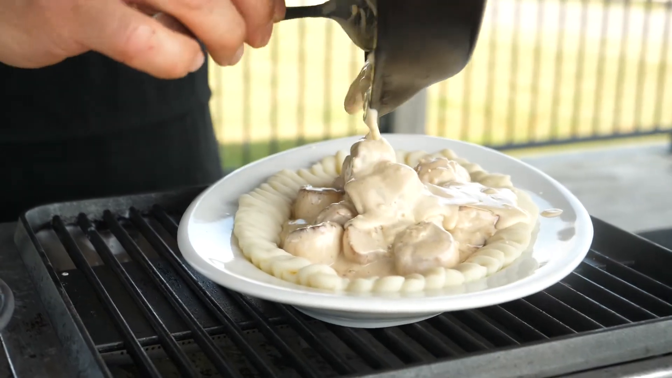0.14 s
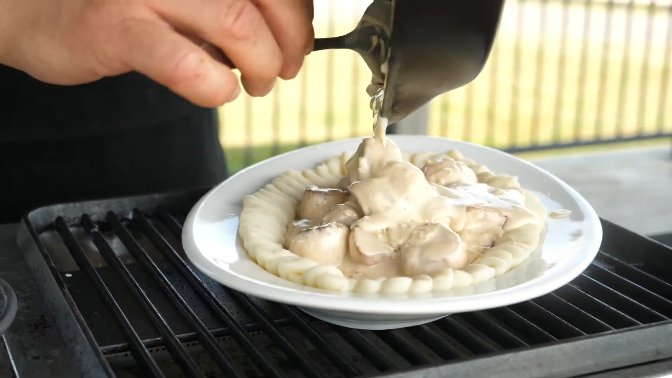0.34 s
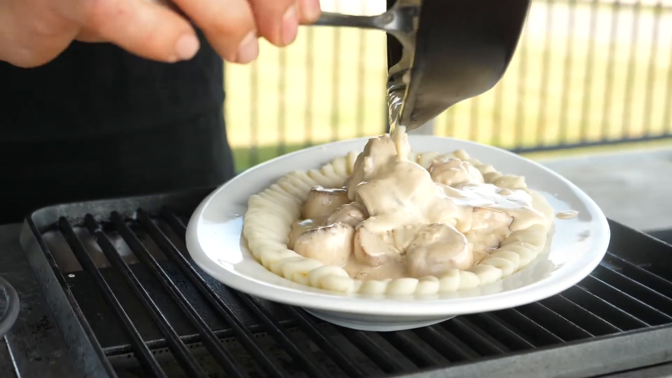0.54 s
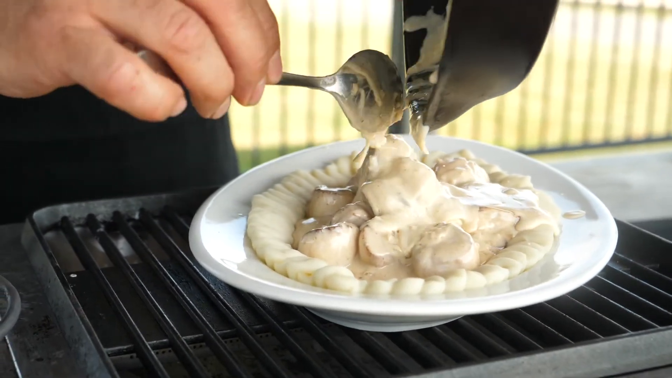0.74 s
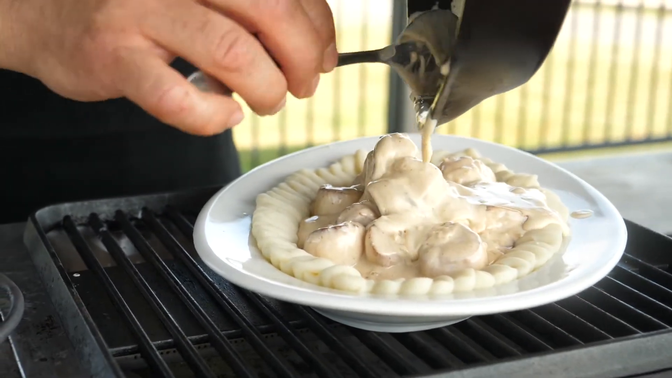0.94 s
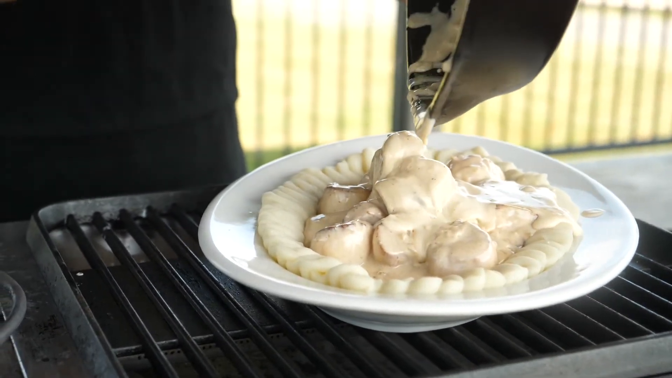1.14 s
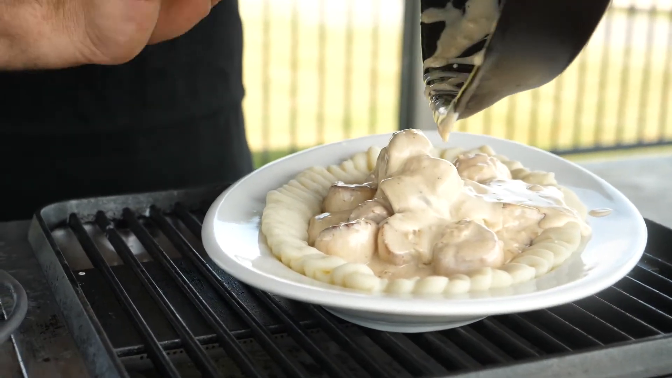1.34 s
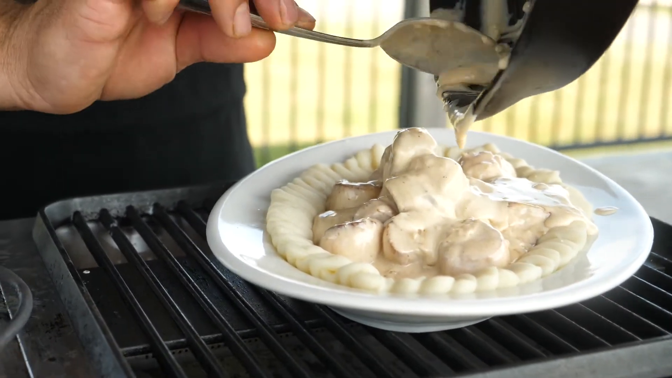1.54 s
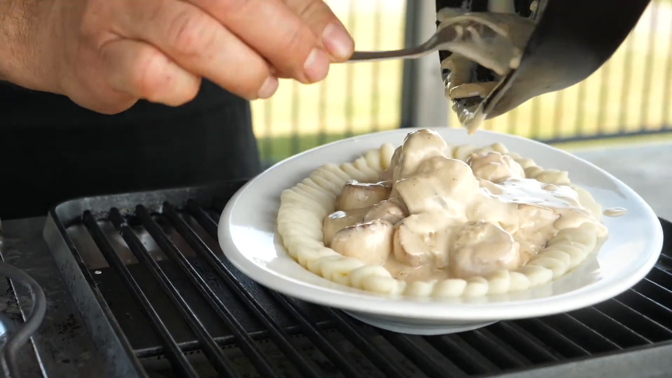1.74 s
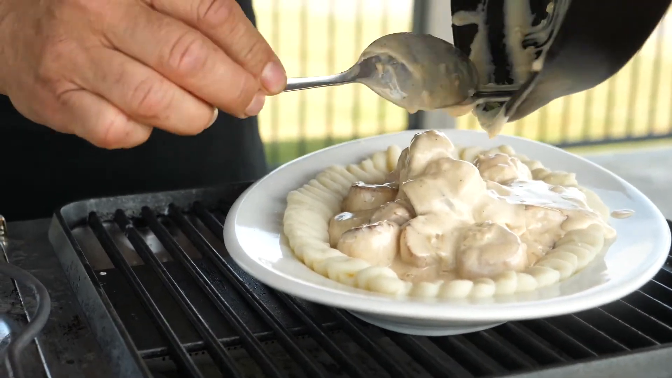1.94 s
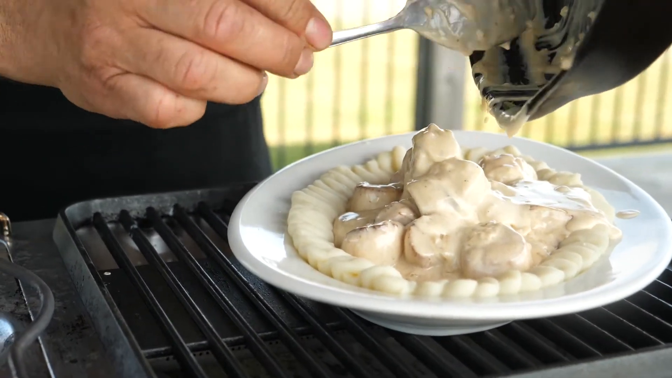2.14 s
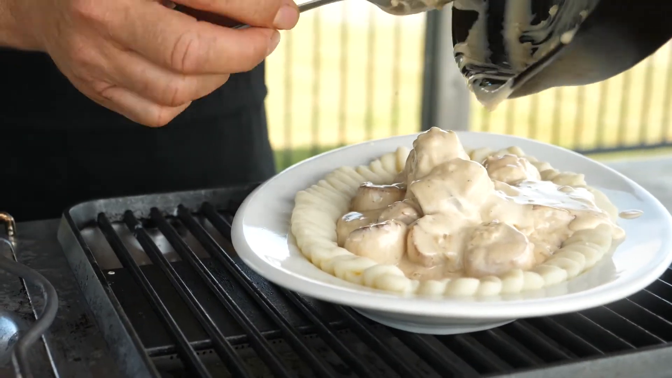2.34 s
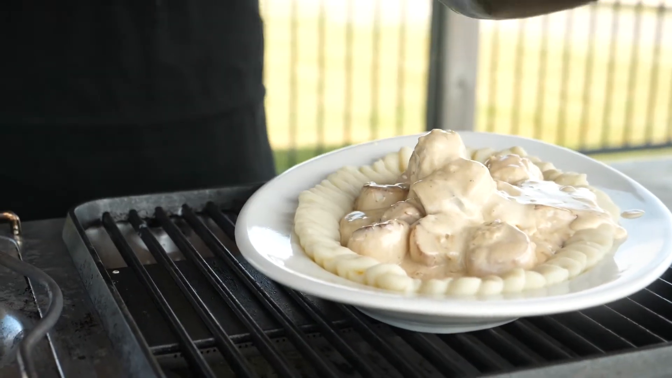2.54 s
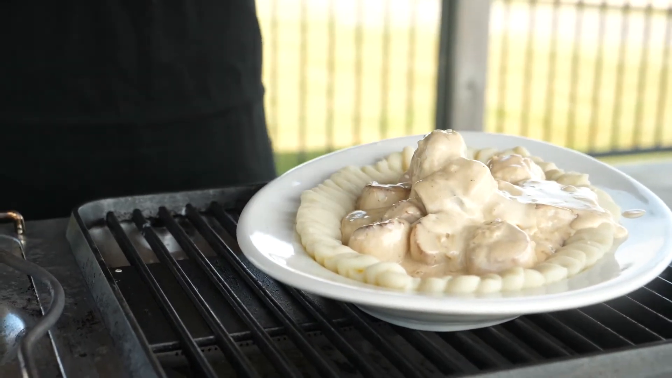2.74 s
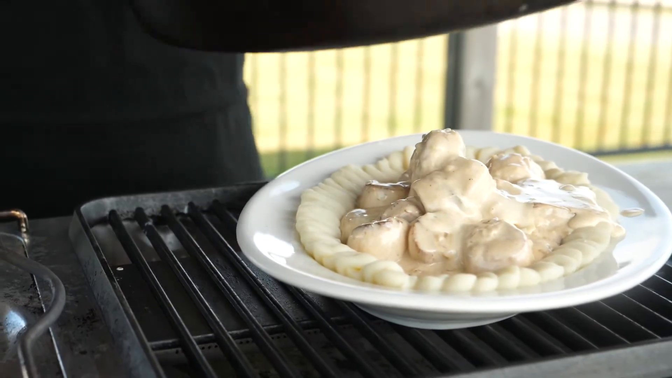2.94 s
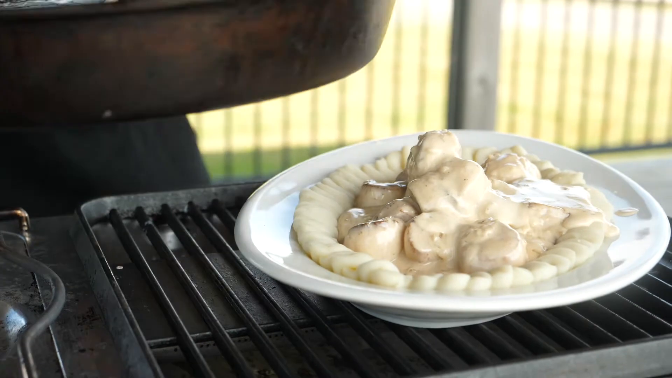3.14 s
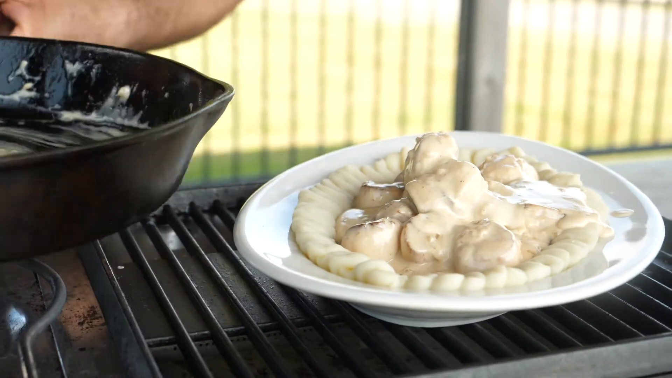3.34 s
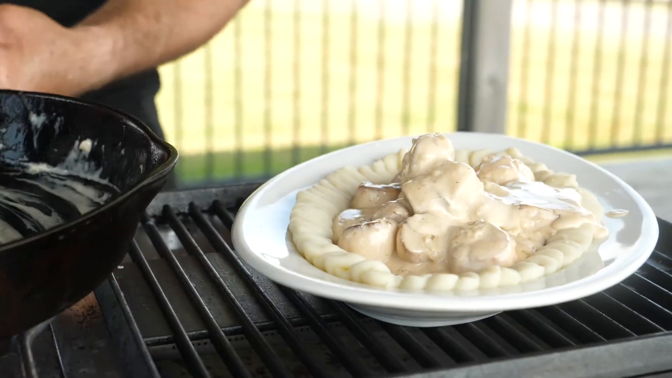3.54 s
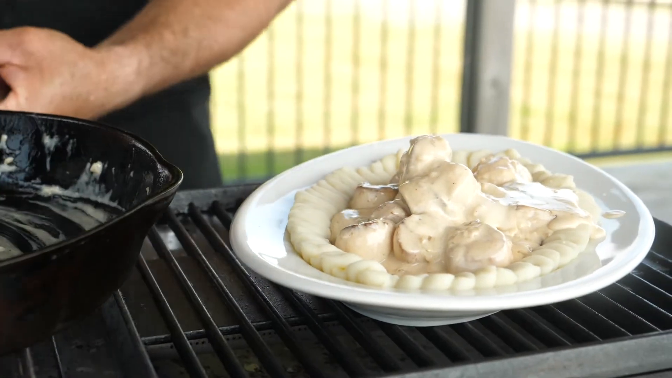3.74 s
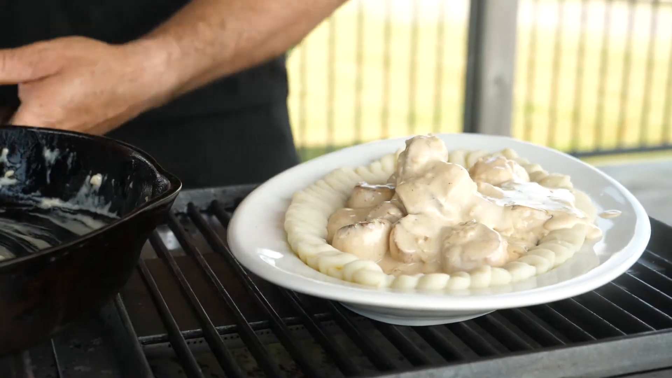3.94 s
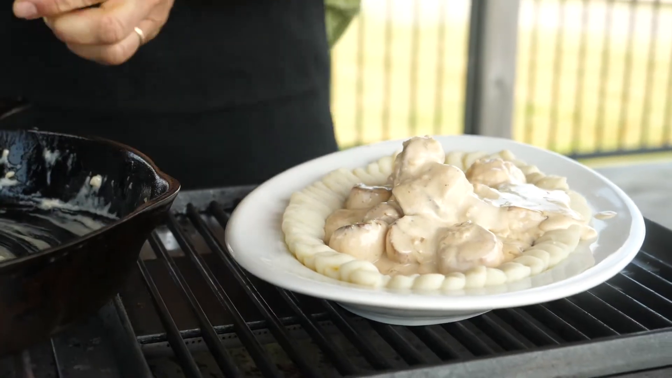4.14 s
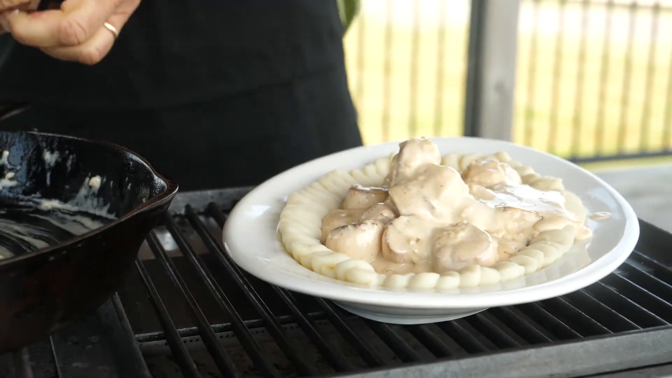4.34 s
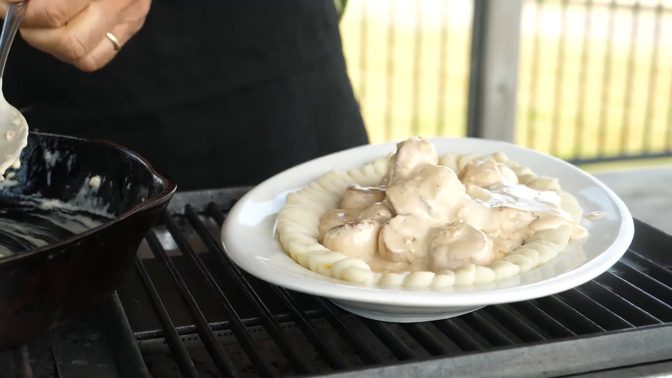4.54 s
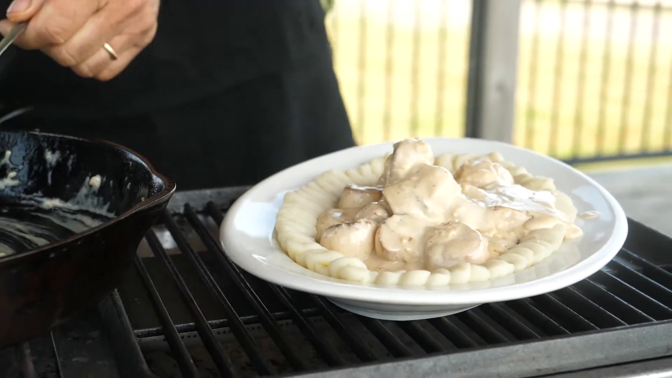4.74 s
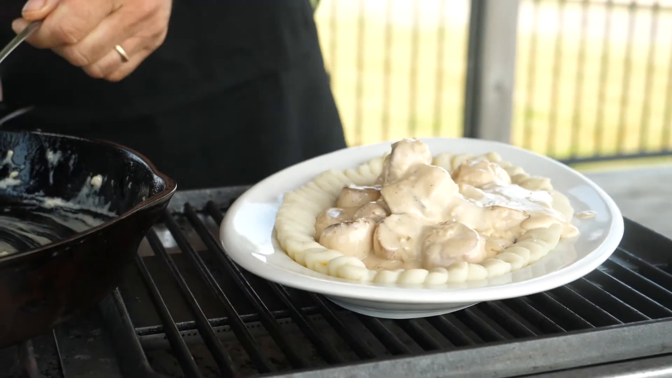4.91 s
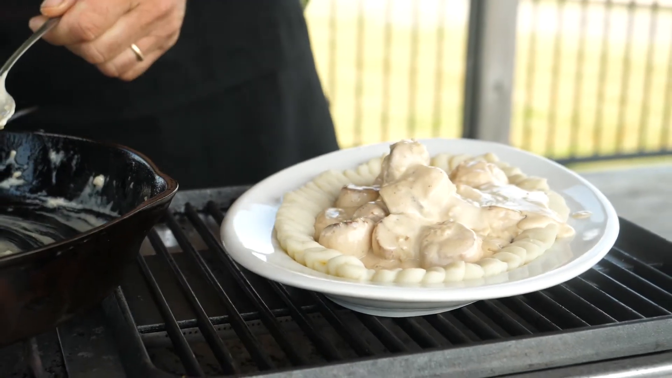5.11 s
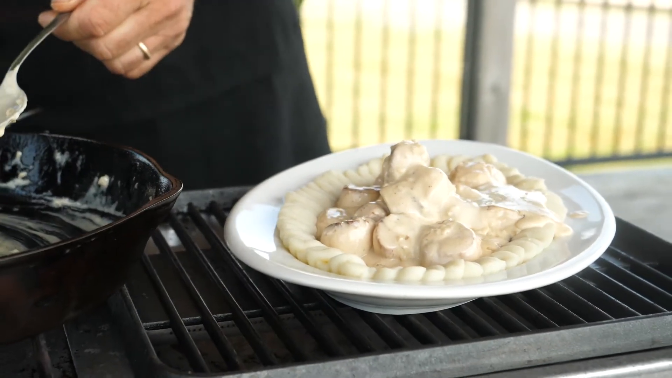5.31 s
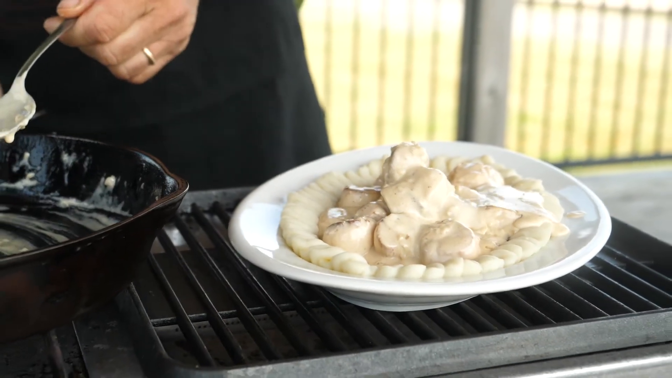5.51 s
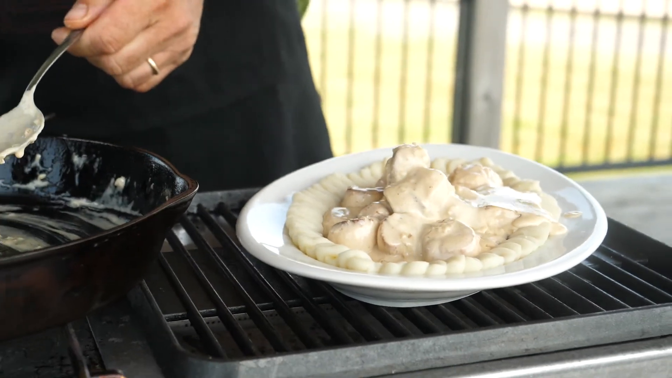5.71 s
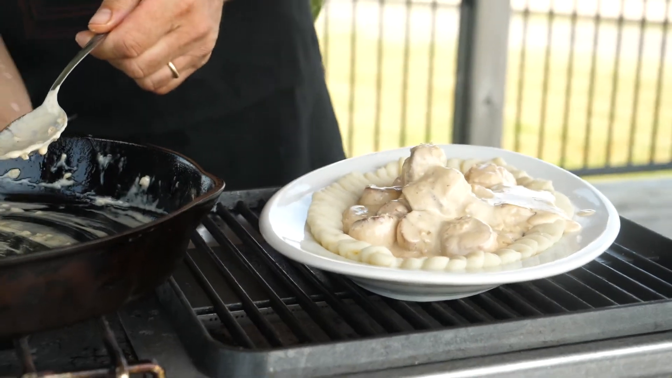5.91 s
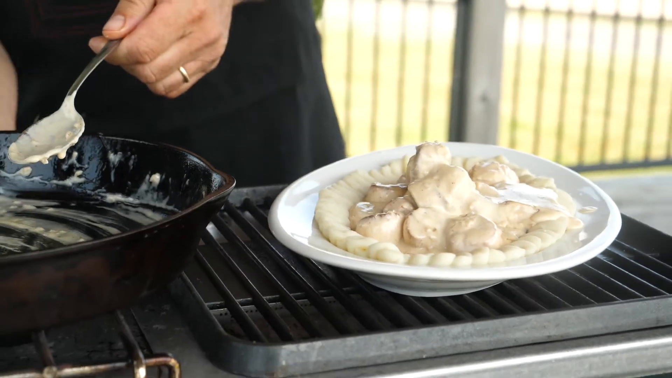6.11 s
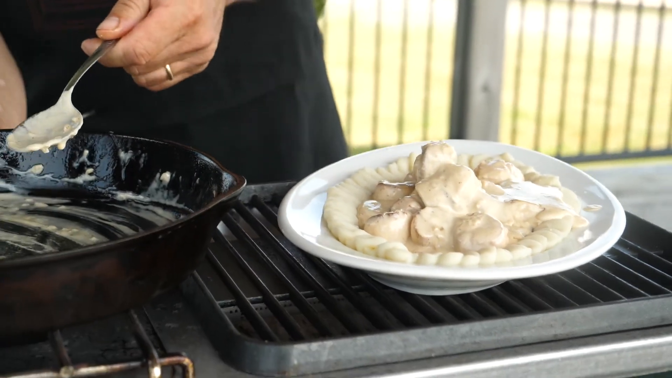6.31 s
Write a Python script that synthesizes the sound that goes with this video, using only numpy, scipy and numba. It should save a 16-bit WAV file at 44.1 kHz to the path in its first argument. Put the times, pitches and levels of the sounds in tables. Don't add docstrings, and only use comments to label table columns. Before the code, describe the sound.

Close outdoors on a porch, a steel spoon clinks irregularly against a heavy iron skillet, with short gritty scrapes between the ringing taps, the last two main ones loudest. After a quiet gap the skillet lands on a metal grate with two heavy clanks and a fading rattle. Soft knocks follow over a faint burner hiss and whistle, low distant rumble and light wind buffeting the microphone.

```python
import sys
import numpy as np
from scipy import signal
from scipy.fft import rfft, irfft, next_fast_len
from scipy.io import wavfile
from scipy.ndimage import uniform_filter1d
from numba import njit

SR = 44100
rng = np.random.default_rng(int(sys.argv[2]) if len(sys.argv) > 2 else 0)


def how_loud(loudness_db):
    steps = np.asarray(loudness_db, float) / 20
    return 10 ** steps


def transcribe(u):
    v = np.clip(np.atleast_2d(u).T, -1, 1)
    q = np.round(v * 32767).astype(np.int16)
    wavfile.write(sys.argv[1], SR, q)


N = 285182
TIME = np.arange(N) / SR

# (frequency [Hz], density [dB/Hz])
TOWN_SPECTRUM = [(24, -83), (40, -53.5), (106, -15), (177, -2.5), (288, 0), (807, -12), (1030, -13),
                 (1100, -11), (1210, -11.5), (2600, -29.5), (3380, -47.5), (5720, -120)]
# (time [s], level [dB])
TOWN_LEVEL = [(0, -46.5), (.15, -54.5), (1.5, -54.5), (2.1, -57), (3.5, -56.5), (4.45, -57), (5.95, -53.5),
              (6.07, -53), (6.17, -59.5), (6.47, -61.5)]
# (frequency [Hz], density [dB/Hz])
WIND_SPECTRUM = [(40, -27.5), (60, -17.5), (100, -2.5), (160, -3), (260, -24.5)]
# (time [s], level [dB])
GUST_PEAKS = [(0.0, -75), (.5, -59.5), (0.759, -60), (1.05, -64.5), (1.5, -57), (1.749, -59), (2.021, -62),
              (2.6, -72), (3.369, -72), (4.75, -62.5), (4.9, -61.5), (5.21, -58), (5.38, -55), (5.599, -52),
              (5.75, -60), (6.07, -71.5), (6.47, -54.5)]
# (frequency [Hz], density [dB/Hz])
HISS_SPECTRUM = [(1060, -31), (1800, -2.5), (2610, -1.5), (3410, 3.5), (3990, 2.5), (7100, 3.5),
                 (15000, -5), (16000, -12.5), (16500, -43)]
# (time [s], level [dB])
HISS_LEVEL = [
    (4.75, -67.5),
    (5.13, -72),
    (5.9, -67.5),
    (6.1, -73),
]
# (frequency [Hz], width [Hz], level [dB])
BURNER_JETS = [(3470, 90, -19), (4500, 76, -16.5), (4990, 160, -9), (6000, 210, -5.5), (6787, 350, -11),
               (8006, 210, -13.5)]
# (time [s], whistle level [dB], jets re hiss [dB])
BURNER_LEVEL = [(2.6, -78.5, -8.5), (2.75, -71, -5), (3.45, -78, -2.5), (4.4, -63.5, -5),
                (4.65, -61.5, -10), (5.13, -61.5, 4.5), (5.79, -62.5, -0.5), (5.96, -57, -3),
                (6.22, -85.5, -12), (6.47, -83, -5)]
# (time [s], level [dB])
WIPE_LEVEL = [
    (4.6, -85.5),
    (4.64, -63),
    (4.7, -58.5),
    (4.75, -61),
    (4.8, -68),
]

# (time [s], peak [dB], centre [Hz])
CLICKS = [(2.7107, -50, 9000), (2.7334, -68, 3500), (2.7455, -41, 8520), (2.8404, -49, 4450),
          (4.4379, -52, 5380), (4.4877, -46, 6950)]

# (frequency [Hz], share of its band [dB], t60 [s])
GRATE_MODES = [(126.9, -14.5, 0.83), (305, -4, 0.088), (326.3, -7, 0.15), (406.6, -6, 0.2),
               (429.5, -4.5, 0.2), (365.6, -6, 0.15), (534, -8.5, 0.086), (539, -11.5, 0.18),
               (711, -8.5, 0.12), (947, -6.5, 0.17), (1019, -3, 0.074), (1066, -6, 0.086),
               (1283, -8, 0.055), (1320, -1.5, 0.049), (1422, -3, 0.083), (870, -12, 0.086),
               (2114, -8, 0.15), (2374, -6, 0.15), (2626, -6, 0.25), (2856, 0, 0.19), (3260, -6, 0.14),
               (3730, -17.5, 0.3), (4380, -8.5, 0.11), (4650, -13.5, 0.61), (5260, -3.5, 0.054),
               (5800, -0.5, 0.067), (6950, -10, 0.096), (7640, -9, 0.1), (7950, -19.5, 0.26),
               (8650, -15.5, 0.069)]
GRATE_BAND_HZ = [170, 420, 1100, 2800, 6500]
# (time [s], thud [dB], bar clank re thud [dB], sharp edge re thud [dB])
LANDING_BLOWS = [(3.633, -19.5, -2.5, 12.5), (3.639, -13, -7.5, -15), (3.65, -15.5, -15, -2.5),
                 (3.744, -28.5, -12, -13.5), (3.839, -11.5, -2.5, -7), (3.848, -13.5, -5.5, -7),
                 (3.894, -26, -24, -6.5), (3.926, -21, -7.5, -37), (3.932, -25.5, -15, -33),
                 (3.947, -39, 9.5, 7.5), (3.957, -21, -7, -1), (3.996, -42.5, 9, 12.5),
                 (4.008, -26, -11, -22), (4.026, -27.5, -21, -8), (4.044, -33, -7.5, -25),
                 (4.067, -31, -3, -2.5), (4.1, -27, -29, -31), (4.126, -53, 16.5, -4),
                 (4.191, -37.5, -1.5, -12), (4.256, -37.5, -5, -13), (4.339, -43, -5.5, -10.5)]
# (time [s], thud [dB], bar clank re thud [dB], sharp edge re thud [dB])
NUDGE_BLOWS = [(4.668, -46.5, 7, -19), (4.737, -29.5, -10.5, -12), (5.135, -46, -13.5, -25),
               (5.262, -41.5, -8, -16), (5.41, -33.5, -11, -18), (5.711, -44.5, -5.5, -22),
               (5.806, -28, -13.5, -17.5), (5.83, -38, -24, -36.5), (5.895, -37.5, -5.5, -24),
               (6.04, -37, -8, -31.5), (6.076, -36, -4, -30), (6.152, -49, -4, -23),
               (6.234, -43.5, -0.5, -9), (6.434, -41, 4, -19.5), (6.443, -32.5, -4, -26)]
# (start [s], length [s], level [dB], tilt [dB/octave], fade [dB/s])
RATTLES = [
    (3.658, 0.17, -22, -1.5, 188),
    (3.858, 0.081, -30, 1, 148),
    (3.952, 0.52, -33.5, -1.5, 40.5),
    (6.02, 0.14, -44, -3, 25),
]
# (time [s], level [dB])
WALL_CHIMES = [(3.846, -30), (3.948, -53), (3.997, -43), (4.068, -46), (4.127, -51), (5.712, -63),
               (5.926, -61), (6.13, -70), (6.24, -65)]

LOW_MODE_HZ = [487, 912.7, 946.3, 1414, 1791, 2083, 1570, 1930]
# (share of its band [dB], t60 [s])
LOW_MODES = [(0, 0.55), (0.5, 1), (0.5, 1), (-3.5, 0.5), (-17, 0.45), (5, 0.21), (-16.5, .15), (-13, 0.16)]
# (frequency [Hz], share of its band [dB], t60 [s])
SKILLET_MODES = [(2443, -15, 0.17), (3550, -8, 0.026), (3903, -12.5, 0.087), (5120, -7.5, 0.074)]
# (frequency [Hz], share of its band [dB], t60 [s])
SPOON_MODES = [(5474, -1, 0.049), (6220, -2, 0.011), (7113, -4, 0.018), (7857, -3, .025), (8670, -3.5, .03),
               (6454, -12.5, .09), (9660, -14, 0.053), (10480, -6.5, .045), (9370, -16.5, 0.043),
               (11260, -12, .048), (13800, -15.5, 0.037), (14600, -22, 0.034)]
TAP_BAND_HZ = [913, 947, 488, 1424, 2085, 6300, 2900, 4700, 8300, 11500]
WALL_MODE_HZ = [2535, 2589, 2853, 3305, 3722]
RIM_MODE_HZ = [4375, 4683, 4884, 5094, 5727]
BOWL_MODE_HZ = [6100, 6525, 6729, 7183, 7640]
SHANK_MODE_HZ = [5525, 6190, 8000, 8667, 1430]
# (t60 [s], response to sliding [dB])
CLEAR_MODES = [(.25, -35.5), (0.32, -37.5), (0.16, -47), (.25, -51.5), (0.21, -42.5), (0.22, -40.5),
               (0.2, -41.5), (0.11, -42), (0.13, -41.5), (0.081, -25), (.09, -36.5), (.11, -35),
               (0.063, -41), (.11, -44.5), (0.099, -40), (0.131, -35.5), (0.092, -31.5), (0.048, -35),
               (0.094, -35.5), (.6, -35)]

# (time [s], blow [dB], brightness [dB], wall modes re blow [dB], lean to the upper wall mode [dB])
TAP_BLOWS = [(0.0084, -11.5, -2.5, -11, 1), (0.2763, -19.5, -6.5, -17, 7), (0.3079, -13, -7.5, -13, 3),
             (0.3718, -40, -8, -24.5, -12), (0.5789, -14, 4, -23, 7), (0.685, -42, -6, -5, 3),
             (0.9186, -17.5, 4, -6, 3.5), (1.1859, -29, -0.5, -3, -2), (1.503, -41.5, -4, 3, 8),
             (1.7889, -4.5, 2, -17.5, -1.5), (1.9697, -37.5, 6, 1, 3.5), (2.248, -1, 2.5, -14, 0)]
# (rim pair [dB], bearing [deg], floor pair [dB], reach from centre [deg], lowest mode [dB])
TAP_SPOTS = [(-30, 3.45, -32, 26, -39.5), (-42, 170, -30.5, 120, -50), (-41, 6, -32.5, 54, -35.5),
             (-45, 31, -40.5, 66, -45.5), (-37, 35, -33, 33, -37.5), (-39, 60, -36, 34, -40.5),
             (-34.5, 43, -26, 35, -40.5), (-42.5, 8, -36, 39, -37), (-41, 49, -36, 9.7, -67),
             (-39.5, 24, -33.5, 63, -41), (-46.5, 60, -50, 30, -70), (-41, 63, -26.5, 60, -40.5)]
# (highest band re rule [dB], old ring left by the landing spoon [dB])
TAP_TOUCH = [(2.5, -9), (-4, -10), (1.5, -14), (0, -5), (-9, -16), (-2, -10), (-1, -8), (-11, 0.5),
             (-4, -1), (-4, -9), (-14, -3), (0.5, -18)]
TAP_WALL = [(-22, -32, -16, -19, -27), (-14, -21.5, -11, -11.5, -8), (-18, -28, -4, -39.0, -15),
            (-7, -6, -7.0, -6, -7), (-13.5, -20.5, -38, -27, -19), (-4.0, -11, -24.0, -19.0, -17),
            (-33, -33.5, -29, -14, -6), (-10, -10, -6, -6, -1), (0.5, 17.5, 3, 10, -1),
            (-22, -20.5, -27, -29, -24), (-11, -8.5, -23, -33, -2), (-22, -20, -32, -23.5, -21)]
TAP_RIM = [(-26, -14.5, -8.5, -10, -8.5), (-29.0, -4, -5, -21.0, 3), (-19, -25, -7, -14, -9),
           (-17.0, -40, -10.0, -8.0, -1.0), (-21, -30, -28.5, -23, -18), (-12.0, -24.0, -6.0, -3.0, 2),
           (-21.5, -17, 4, -11, 7), (-6, 4.5, -8.5, -21.0, 1), (-2, 0, -11.0, -22.0, 17),
           (-29, -20, -32.5, -12.5, -11), (-19, -2.5, -10, -19.5, 5), (-23.5, -21.5, -18, -19, -2)]
TAP_BOWL = [(-19.5, -20, -22, -22, -21), (-22, -18, -16, -30.0, -29.0), (-27.0, -22, -26, -5, -5),
            (-4, -1, -16.0, -4.0, -10.0), (-5, -10, -22.0, -8, -15), (2.5, -10.0, 20, -7.0, -7),
            (-24.0, -12, -14.5, 5, -11), (-5.0, -1, 0, 2, -1), (-4, 0, 1.0, -6.0, -9.0),
            (-0.5, -7.5, -4, -11, -7), (6, 7, -12.0, -6, -16.0), (-3.5, -4.5, -11.5, -22.5, -27.5)]
# (each shank mode, then the floor twin, re blow [dB])
TAP_SHANK = [(-3, -15, 0.5, -28, -25), (-1, -26, -8, -4, -18), (-3.5, -21, -2, -19, -7),
             (0, -5, -9, -16, -20), (-31.5, -18, 11, -2, -22), (-14, -8, 0, -12, -14),
             (-8, -6.5, 11.5, -17, -8.5), (-7, -15, 10.5, 3, -5), (-8, 0, -5, 0.5, 22),
             (-8.5, -16.5, -13, -7, -29.5), (1, 4, -11, -25, -21), (-12.5, -0.5, -10, -17.5, -24)]
# (level re blow [dB], centre [Hz])
TAP_CRACKS = [(-14.5, 6330), (-13, 7200), (-7, 6500), (-20, 6500), (-3.5, 6700), (-20, 6500), (-8, 7500),
              (-14, 7500), (-10, 6500), (-10, 6300), (-20, 6500), (-13.5, 6400)]

# (start [s], end [s], pressure [dB], change along the stroke [dB], body [dB])
STROKES = [(0.045, 0.139, -41.5, -2.5, -39.5), (0.319, 0.413, -39.5, 13.5, -43.5),
           (0.627, 0.704, -36.5, 5.5, -46.5), (0.682, 0.776, -44, -17, -44.5),
           (0.931, 1.027, -40.5, -2.5, -42.5), (1.273, 1.436, -43, 4, -43), (1.396, 1.505, -38.5, 0, -38.5),
           (1.473, 1.604, -41.5, -2.5, -44.5), (1.864, 2.004, -42.5, 0, -46)]
# (lower rim [dB], upper rim [dB], floor [dB], inner floor [dB], wall modes [dB])
STROKE_PATHS = [(-6, -3, 3, -2.5, -0.5), (-4, -4, -2, 2, 3.5), (-16, 6, 1.5, -4, 0.5),
                (-2.5, 3, -4.5, 3, 5), (-6, -1.5, 5, 0, -3.5), (-2.5, 4.5, -2.5, -1.5, 1),
                (-8, -4, 0, -4, 4.5), (-6.5, -4.5, 2.5, 5, -6), (-1.5, -3.5, -0.5, 1, 6)]
# (centre at start [Hz], centre at end [Hz], level [dB])
STROKE_HOLLOWS = [(1120, 1300, -64.5), (1350, 1400, -58), (1366, 1700, -52), (886, 1100, -55),
                  (1350, 1200, -59), (1250, 1450, -53.5), (1460, 1200, -51), (1300, 720, -56.5),
                  (1200, 1300, -52)]
# (time [s], length [s], treble [dB], rim squeal [dB], body [dB])
EDGE_CATCHES = [(0.076, 0.016, -1, 2, -5.5), (0.373, 0.026, 4, 2, 5), (0.641, 0.023, 6.5, 7.5, 3),
                (0.668, .008, 2.5, 6, 3), (0.679, 0.01, 5.5, 7, 7.5), (0.717, 0.011, 4, 0.5, 5.5),
                (0.727, 0.026, 6.5, 13.5, 6), (1.259, 0.022, -4, 0, 5), (1.294, 0.017, 3.5, 6, -1),
                (1.334, 0.039, 1.5, 4.5, 1), (1.377, 0.017, 1, -10, 0.5), (1.427, 0.02, 2.5, 6, 1),
                (1.505, 0.039, -1.5, 2, 5.5), (1.544, 0.04, 2.5, -2, 3), (1.888, 0.025, 1, 3, 3),
                (1.914, 0.015, 1.5, -1.5, 1.5), (1.963, 0.018, 4.5, 3.5, -2)]

BODY_FOLLOWS = 0.4


def unit(x):
    return x / np.sqrt(np.mean(x ** 2))


def curve(rows):
    s, *columns = np.transpose(rows)
    return np.array([np.interp(TIME, s, c) for c in columns])


def contact(rows):
    since_start = TIME - rows[0][0] + 0.013
    until_end = rows[-1][0] - TIME
    return np.clip(np.minimum(since_start, until_end) / 0.01, 0, 1)


def walk(rate_hz):
    hold = int(SR / rate_hz)
    steps = np.repeat(rng.standard_normal(N // hold + 1), hold)
    return unit(uniform_filter1d(uniform_filter1d(steps, hold), hold)[:N])


def resonate(x, hz, t60_s):
    pole = np.exp(2j * np.pi * hz / SR - np.log(1000) / (t60_s * SR))
    return signal.lfilter([0, pole.imag], [1, -2 * pole.real, abs(pole) ** 2], x)


def narrow_noise(hz, width_hz):
    return unit(resonate(rng.standard_normal(N), hz, 2.2 / width_hz))


def coloured(points, flicker_db, rate_hz):
    hz, db = np.transpose(points)
    size = next_fast_len(N, real=True)
    bins = np.maximum(np.arange(size // 2 + 1) * SR / size, 1)
    gain_db = np.interp(np.log(bins), np.log(hz), db, left=-80, right=-80)
    shaped = rfft(rng.standard_normal(size)) * how_loud(gain_db)
    out = 0
    for centre in np.arange(np.log2(hz[0]), np.log2(hz[-1]) + 0.5, 0.5):
        share = np.clip(1 - 2 * abs(np.log2(bins) - centre), 0, 1)
        out = out + irfft(shaped * share, size)[:N] * how_loud(flicker_db * walk(rate_hz))
    return unit(out)


@njit
def bank(force, place, gain, pole, grip):
    out = np.zeros(force.shape[1])
    for m in range(len(pole)):
        k = min(int(place[m]), force.shape[0] - 2)
        w, z = place[m] - k, 0j
        for i in range(len(out)):
            push = (1 - w) * force[k, i] + w * force[k + 1, i]
            z = z * pole[m] * grip[i] + push + 1e-18
            out[i] += gain[m] * z.imag
    return out


def ring(force, bands_hz, modes, grip):
    hz, db, t60_s = np.transpose(sorted(modes))
    order = np.argsort(bands_hz)
    place = np.interp(np.log(hz), np.log(np.take(bands_hz, order)), np.arange(len(order)))
    pole = np.exp(2j * np.pi * hz / SR - np.log(1000) / (t60_s * SR))
    sign = rng.choice([-1., 1.], len(hz))
    return bank(np.ascontiguousarray(force[order]), place, how_loud(db) * sign, pole, grip)


def crowd(lo_hz, hi_hz, db, tilt_db, t60_1k_s, slope, uneven_db, count):
    chance = rng.random((count, 3))
    hz = lo_hz * (hi_hz / lo_hz) ** ((np.arange(count) + chance[:, 0]) / count)
    level_db = db + tilt_db * np.log2(hz / lo_hz) ** 2
    level_db = level_db + uneven_db * (chance[:, 2] - 0.5)
    t60_s = t60_1k_s * (1000 / hz) ** slope * (0.5 + chance[:, 1])
    return list(zip(hz, level_db, t60_s))


def damped(modes, above_hz, share):
    return [(hz, db, t60_s * (share if hz > above_hz else 1)) for hz, db, t60_s in modes]


def blows(rows, contact_s, rise, spike, count):
    force = np.zeros((count, N + 2048))
    rough = rng.standard_normal((len(rows), 2048))
    for row, noise, tau_s in zip(rows, rough, contact_s):
        t = (np.arange(2048) + 1) / (max(tau_s, 1e-4) * SR)
        push = noise * np.exp(-t) * np.minimum(t / rise, 1)
        push = np.sqrt(1 - spike)[:, None] * push / np.sqrt(np.sum(push ** 2))
        push[:, 0] += np.sqrt(spike)
        i = int(row[0] * SR)
        force[:, i:i + 2048] += how_loud(np.array(row[1:count + 1]))[:, None] * push
    return force[:, :N]


def grit(patchy_db, grain_db, count):
    grains = rng.standard_normal(N) * how_loud(grain_db * rng.exponential(size=N))
    grains = grains * how_loud(1.5 * walk(120))
    return unit(grains) * how_loud([patchy_db * walk(30) for _ in range(count)])


def town():
    return how_loud(curve(TOWN_LEVEL)[0] + 1.903 * walk(5.1)) * coloured(TOWN_SPECTRUM, 2.6, 24)


def wind():
    calm_db, slope_db_per_s = -85, 90
    peaks_db = [db - slope_db_per_s * abs(TIME - s) for s, db in GUST_PEAKS]
    level_db = np.max(peaks_db, axis=0).clip(calm_db)
    return how_loud(level_db - 2.5 + 4.6 * walk(6.3)) * coloured(WIND_SPECTRUM, 2.1, 10)


def burner():
    whistle_db, jets_db = curve(BURNER_LEVEL)
    jets = sum(how_loud(db + jets_db + 3.3 * walk(6.3)) * narrow_noise(hz, width_hz)
               for hz, width_hz, db in BURNER_JETS)
    hiss = how_loud(curve(HISS_LEVEL)[0] + 2) * (coloured(HISS_SPECTRUM, 1.1, 6.6) + jets)
    flutter_db = 2.5 * walk(25)
    return hiss + how_loud(whistle_db + 3 + flutter_db) * narrow_noise(1112, 37)


def wipe():
    return how_loud(curve(WIPE_LEVEL)[0]) * contact(WIPE_LEVEL) * narrow_noise(7400, 2150)


def porch(x):
    t60_s, delay_s, level_db = 0.29, 0.003, -24
    t = TIME[:int(0.4 * SR)]
    tail = rng.standard_normal(len(t)) * how_loud(-60 * t / t60_s) * (t > delay_s)
    tail = signal.lfilter([1], [1, -0.3], tail)
    tail = tail / np.sqrt(np.sum(tail ** 2))
    return x + how_loud(level_db) * signal.fftconvolve(x, tail)[:N]


def ticks():
    out = np.zeros(N)
    t = TIME[:300]
    for s, db, hz in CLICKS:
        i = int(s * SR)
        out[i:i + 300] += how_loud(db + 12) * np.sin(2 * np.pi * hz * t) * np.exp(-t / 0.00012)
    return out


def knocks(rows, frame_db):
    middle_db = -9
    s, thud, clank, edge = np.transpose(rows)
    middle = thud + (clank + edge) / 2 + middle_db
    return np.transpose([s, thud + frame_db, thud, thud + clank, middle, thud + edge])


def buzz(start_s, length_s, db, tilt_db, fade_db):
    extra_fade = 0.11
    octave = np.log2(np.divide(GRATE_BAND_HZ, 420))
    first = db + tilt_db * octave.clip(0) + 8 * octave.clip(None, 0)
    last = first - fade_db * length_s * (1 + extra_fade * octave)
    return [(start_s, *first), (start_s + length_s, *last)]


def grate():
    start = int(3.6 * SR)
    rows = np.vstack([knocks(LANDING_BLOWS, -12.5), knocks(NUDGE_BLOWS, -18)])
    contact_s = np.repeat([0.0063, 0.0027], [len(LANDING_BLOWS), len(NUDGE_BLOWS)])
    spike = np.array([0.26, 0.18, 0.071, 0.031, 0.08])
    force = how_loud(-6.5) * blows(rows, contact_s, 0.27, spike, count=5)
    rattles = [buzz(*row) for row in RATTLES]
    rattle_gain = sum(contact(r) * how_loud(curve(r) - 40.5) for r in rattles)
    force = force + grit(patchy_db=3.2, grain_db=2.5, count=5) * rattle_gain
    modes = damped(GRATE_MODES, 1900, 0.32)
    modes += crowd(170.4, 1800, -18, 0.23, 0.18, 0.06, 1.6, count=80)
    modes += crowd(1800, 15500, -15.5, -1.3, 0.19, 0.58, 1.48, count=160)
    sound = ring(force[:, start:], GRATE_BAND_HZ, modes, np.ones(N - start))
    sound = signal.sosfilt(signal.butter(4, 75, "high", fs=SR, output="sos"), sound)
    return np.pad(sound, (start, 0))


def chimes():
    s, db = np.transpose(WALL_CHIMES)
    force = np.zeros(N)
    force[(s * SR).astype(int)] = how_loud(db)
    return resonate(uniform_filter1d(force, size=3), hz=2855, t60_s=0.097)


def cracks():
    decay_s, rise_s, width_hz = 0.0026, 0.00033, 1800
    out, t = np.zeros(N), TIME[:2048]
    envelope = np.exp(-t / decay_s) * np.minimum(t / rise_s, 1)
    for (s, blow_db, *_), (db, hz) in zip(TAP_BLOWS, TAP_CRACKS):
        i = int(s * SR)
        out[i:i + 2048] += how_loud(blow_db + db - 8.5) * narrow_noise(hz, width_hz)[-2048:] * envelope
    return signal.sosfilt(signal.butter(3, 3000, "high", fs=SR, output="sos"), out)


def strokes():
    bite_s, bite_db, lift_s, lift_db = 0.047, -12, 0.045, -20
    for (start, end, db, change_db, body_db), path in zip(STROKES, STROKE_PATHS):
        half_db = change_db / 2
        times = [start, start + bite_s, end - lift_s, end]
        shape = [bite_db - half_db, -half_db, half_db, lift_db + half_db]
        yield [(s, db + d, *(body_db + BODY_FOLLOWS * d + np.array(path))) for s, d in zip(times, shape)]


def hollow():
    width = int(SR / 330)
    out = 0
    for rows, (_, _, mean_db, *_), (first_hz, last_hz, db) in zip(strokes(), STROKES, STROKE_HOLLOWS):
        hz = np.interp(TIME, [rows[0][0], rows[-1][0]], [first_hz, last_hz])
        band = uniform_filter1d(uniform_filter1d(rng.standard_normal(N), width), width)
        rub = unit(band * np.sin(2 * np.pi * np.cumsum(hz) / SR))
        shape_db = BODY_FOLLOWS * (curve(rows)[0] - mean_db)
        out = out + how_loud(db + shape_db) * contact(rows) * rub
    return out


def catches():
    edge_s = 0.0077
    s, length_s, *db = np.transpose(EDGE_CATCHES)
    since = TIME - s[:, None]
    inside = np.minimum(since, length_s[:, None] - since)
    return np.array(db) @ np.clip(inside / edge_s + 0.5, 0, 1)


def friction():
    band_db = [-38, -41.5, -42, -28, -35.5, -23.5, -27, -29, -24, -34]
    gather_db = np.array([*band_db, *np.transpose(CLEAR_MODES)[1]])[:, None]
    follow = [1, 2, 2, 3, 4, 0, 5, 0, 0, 0] + [5] * 5 + [0] * 14 + [3]
    pressure = sum(contact(rows) * how_loud(curve(rows)) for rows in strokes())
    treble_db, squeal_db, body_db = catches()
    caught_db = np.where(np.equal(follow, 0)[:, None], treble_db, body_db)
    caught_db[19] += squeal_db
    rough = grit(patchy_db=2.8, grain_db=2.4, count=30)
    return rough * pressure[follow] * how_loud(gather_db + caught_db)


def mode_pair(db, deg):
    angle = np.radians(deg)
    return [db + 20 * np.log10(abs(f(angle)) + 1e-3) for f in (np.cos, np.sin)]


def tap_rows():
    shine_db, top_db, top_per_db = -3, -7.5, -0.4
    s, blow, bright, wall, lean = np.transpose(TAP_BLOWS)
    rim, bearing, floor, reach, lowest = np.transpose(TAP_SPOTS)
    top = blow + bright + top_db + top_per_db * blow + np.transpose(TAP_TOUCH)[0]
    clear = blow - 9 + np.hstack([TAP_WALL, TAP_RIM, TAP_BOWL, TAP_SHANK]).T
    return np.transpose([s, *mode_pair(rim, bearing), lowest, *mode_pair(floor, reach), blow,
                         blow + wall - lean, blow + wall + lean, blow + bright + shine_db, top, *clear])


def skillet():
    held = int(3.2 * SR)
    rows = tap_rows()
    spike = np.repeat([0.97, 0.45, 0.9], [5, 5, 20])
    force = how_loud(-0.5) * blows(rows, np.full(len(rows), 0.0007), 0.11, spike, count=30) + friction()
    grip = how_loud(-30 * sum(contact(r) for r in strokes()) / SR)
    grip[(rows[:, 0] * SR).astype(int)] = how_loud(np.transpose(TAP_TOUCH)[1])
    grip = np.minimum(grip[:held], 1)
    modes = [(hz, *row) for hz, row in zip(LOW_MODE_HZ, LOW_MODES)]
    modes += SKILLET_MODES + damped(SPOON_MODES, 5000, 0.6)
    modes += crowd(700, 4800, -12.5, 0.28, 0.0692, 0.24, 9.5, count=30)
    modes += crowd(4800, 15500, -19, -2.2, 0.32, 0.92, 4.7, count=120)
    sound = ring(force[:10, :held], TAP_BAND_HZ, modes, grip)
    clear_hz = WALL_MODE_HZ + RIM_MODE_HZ + BOWL_MODE_HZ + SHANK_MODE_HZ
    clear = [(hz, 0, t60_s) for hz, (t60_s, _) in zip(clear_hz, CLEAR_MODES)]
    sound += ring(force[10:, :held], clear_hz, clear, grip)
    sound = signal.sosfilt(signal.butter(3, 400, "high", fs=SR, output="sos"), sound)
    return np.pad(sound, (0, N - held))


def scene():
    background = town() + wind() + burner() + wipe()
    iron = porch(ticks() + grate() + chimes() + skillet())
    return (background + iron + cracks() + hollow())[None]


def band_limit(x):
    return signal.sosfilt(signal.butter(12, 16690, fs=SR, output="sos"), x)


def record(dry):
    thin = signal.sosfilt(signal.butter(2, 90, "high", fs=SR, output="sos"), dry)
    thin = signal.sosfilt(signal.butter(2, 14000, fs=SR, output="sos"), thin)
    rounded = 0.95 * np.tanh(thin / 0.95)
    mix = signal.sosfilt(signal.butter(12, 15900, fs=SR, output="sos"), rounded)
    return band_limit(mix)


dry = scene()
out = record(dry)
transcribe(out)
```